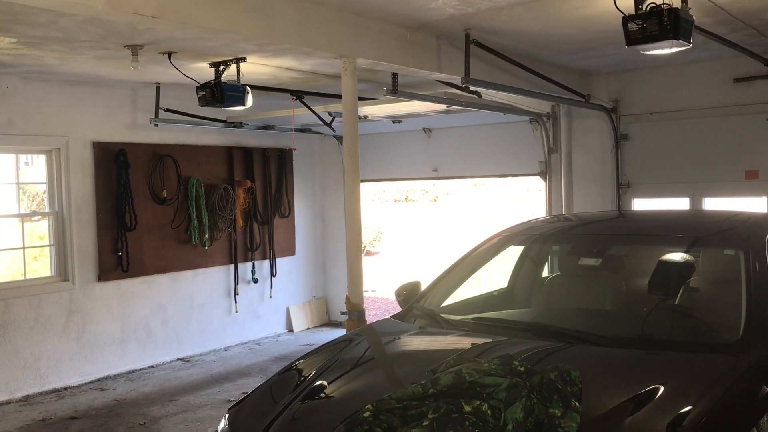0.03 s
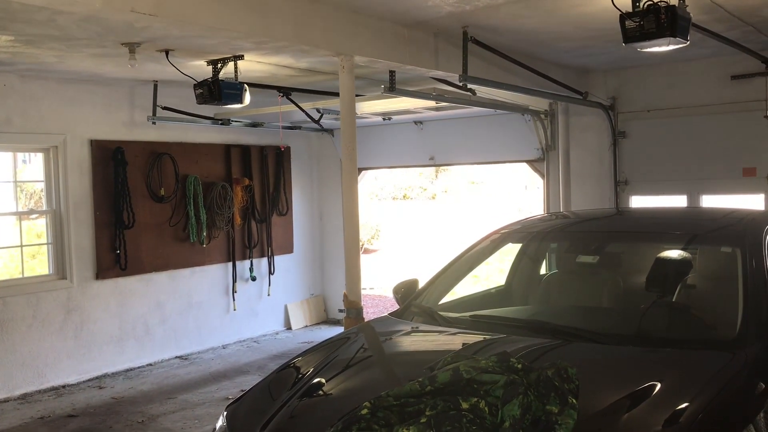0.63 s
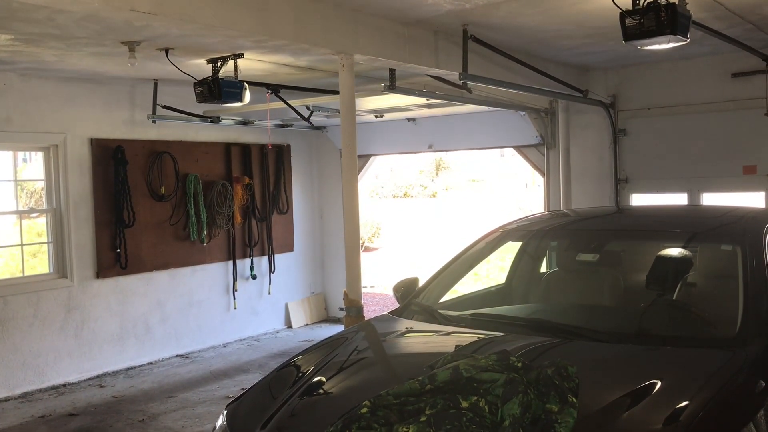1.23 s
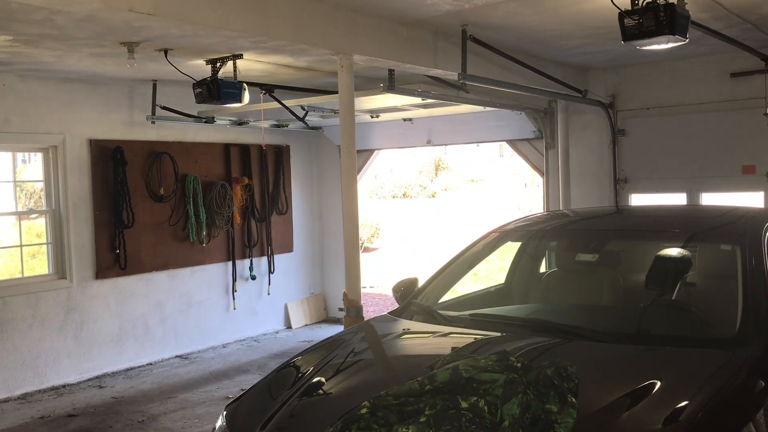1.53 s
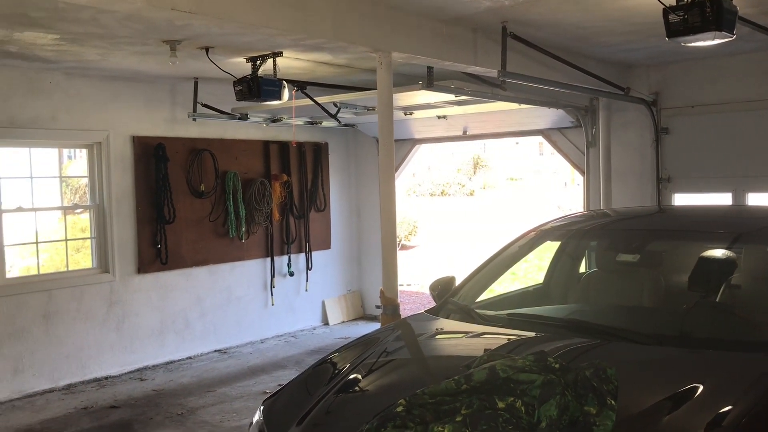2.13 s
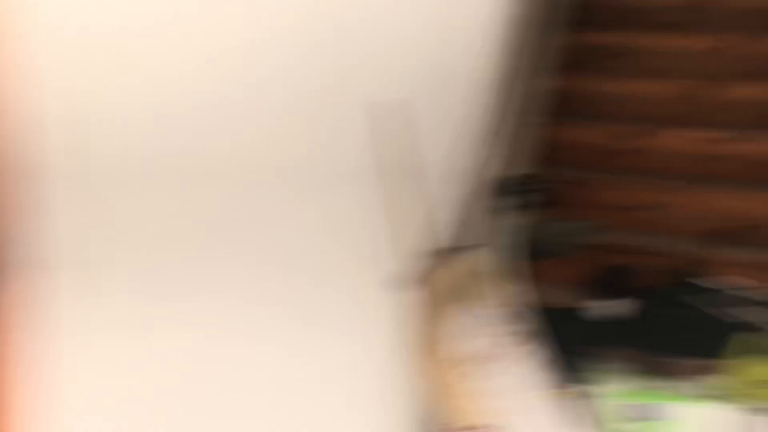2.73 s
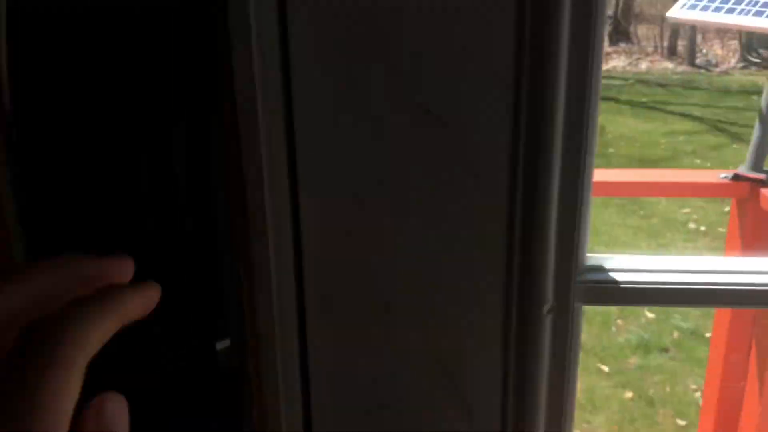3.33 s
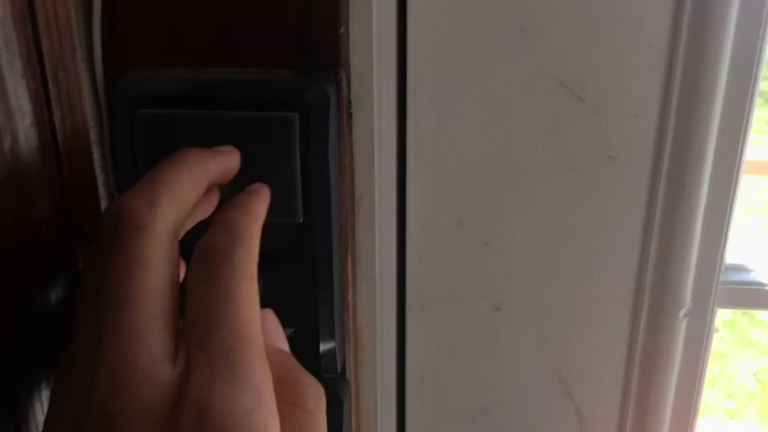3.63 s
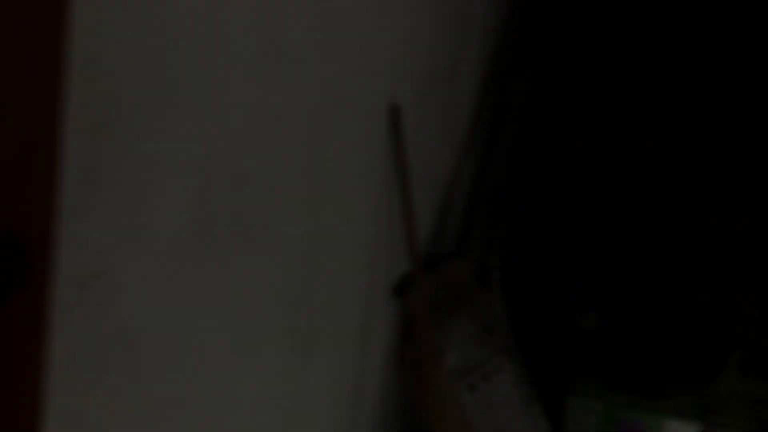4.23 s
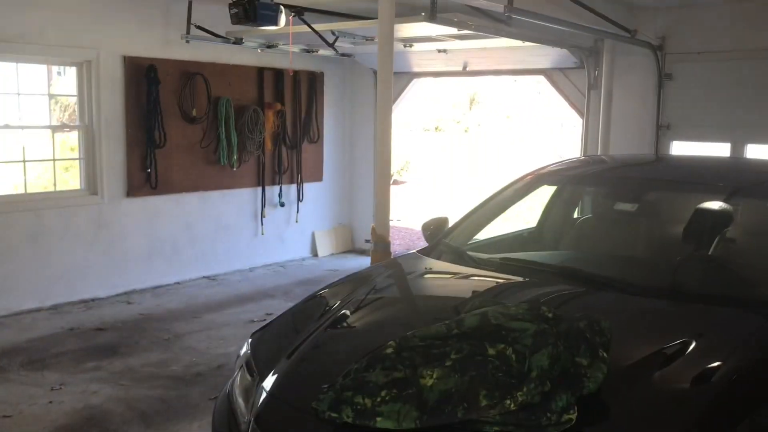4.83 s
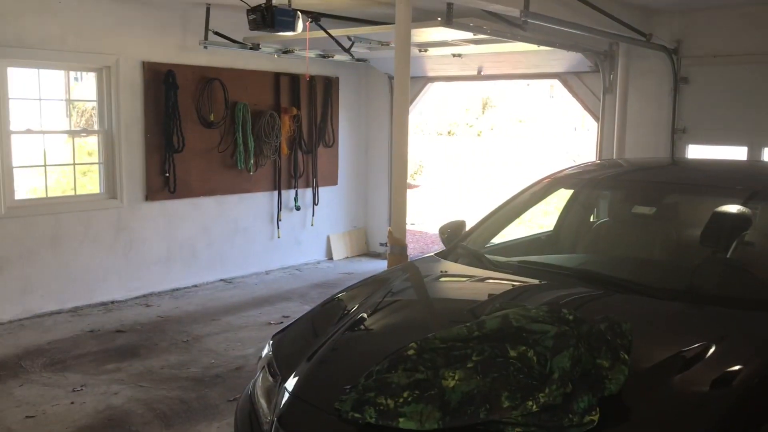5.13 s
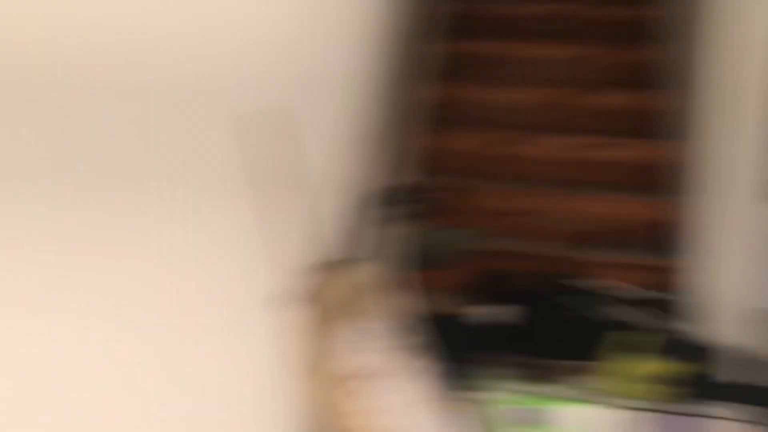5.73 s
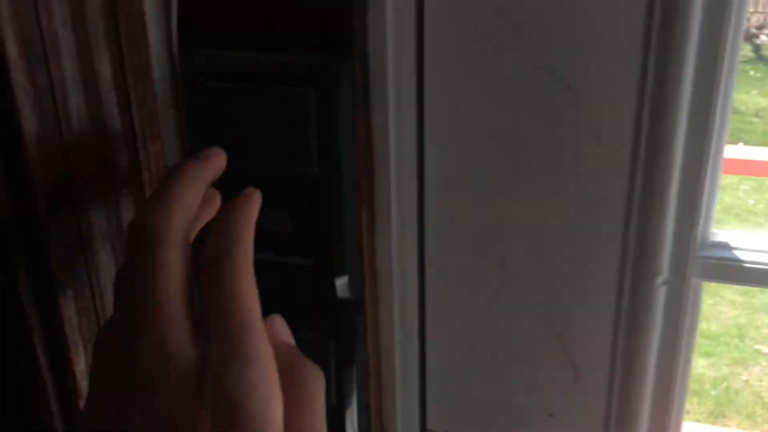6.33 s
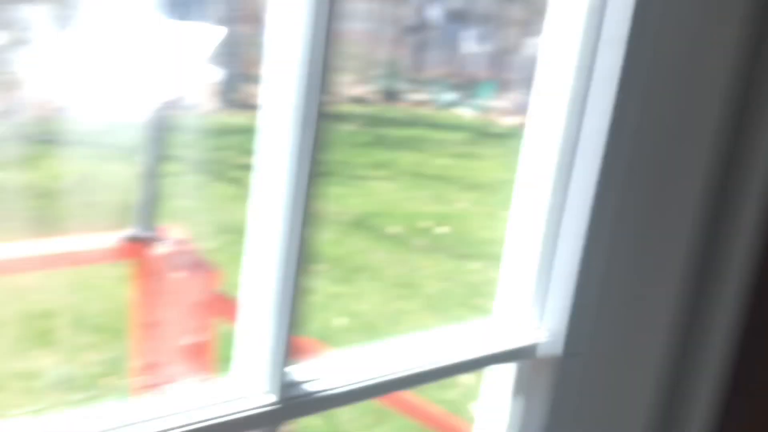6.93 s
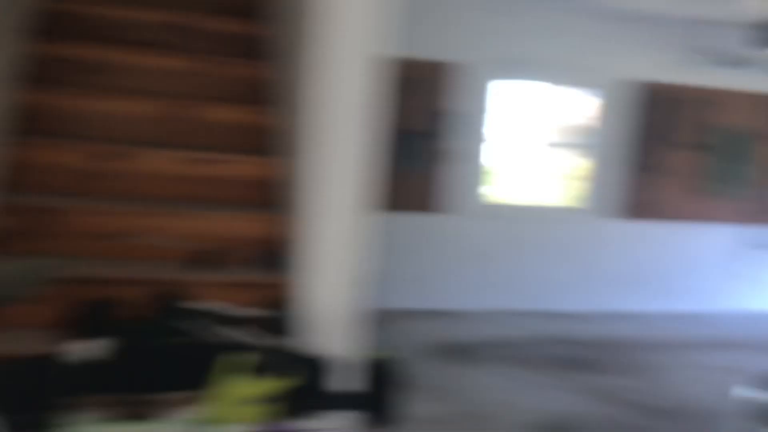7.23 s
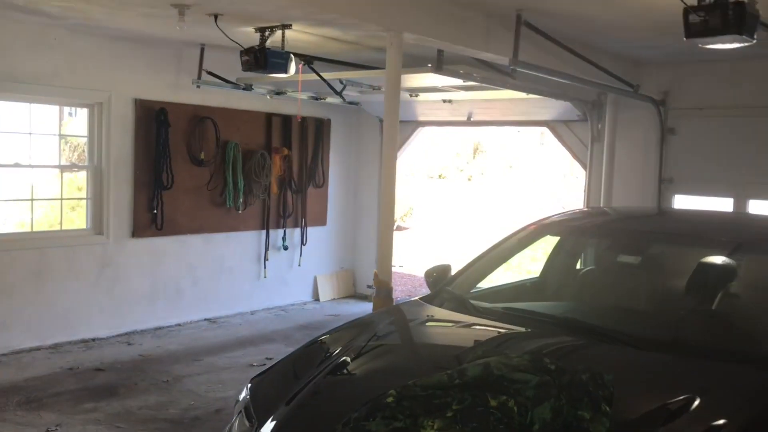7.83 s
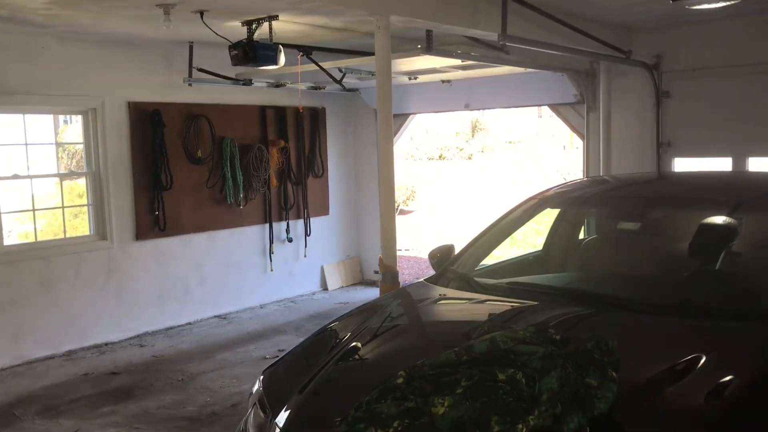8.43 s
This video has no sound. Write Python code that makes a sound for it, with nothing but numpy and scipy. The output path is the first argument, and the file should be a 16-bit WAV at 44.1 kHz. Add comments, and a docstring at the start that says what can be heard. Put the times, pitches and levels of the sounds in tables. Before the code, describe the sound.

A garage door rolls open with a motor hum, rattling chain, high squeaks and steel knocks that echo off hard walls. After it halts, soft close sounds take over: cloth rustle, taps and low puffs of air on a handheld microphone, with two plastic button clicks and a few relay snaps further off. Then the opener starts again, and the descending door clanks sharply in its track.

```python
"""A hard-walled garage: an opener hauls a sectional door open, stops, and later starts it down again.
The motor hums, the panels rumble, chain and rollers rattle along the steel track, dry hinges squeak
and knock, loudest on the way down, and relays snap in the opener's housing.
Between the runs someone with a handheld microphone turns twice to press the wall button:
a sleeve rustles, fingers tap the case and air puffs over the microphone."""
import sys
import numpy as np
from scipy import signal
from scipy.fft import rfft, irfft, next_fast_len
from scipy.io import wavfile
from scipy.ndimage import uniform_filter1d, map_coordinates

SR = 44100
rng = np.random.default_rng(int(sys.argv[2]) if len(sys.argv) > 2 else 0)


def wav_out(sig):
    """Save sig, one row per channel (or a flat mono array), as 16-bit PCM at SR to the path in sys.argv[1]."""
    wavfile.write(sys.argv[1], SR, np.round(np.clip(np.atleast_2d(sig).T, -1, 1) * 32767).astype(np.int16))


N = 377937

# room tone: (frequency [Hz], level [dB])
ROOM_SPECTRUM = [(15, -50), (25, -10.5), (59, -4.5), (122, -14), (410, -19), (469, -24), (537, -22),
                 (648, -23.5), (1450, -34.5), (15500, -40.5)]
# reverb decay: (frequency [Hz], t60 [s])
GARAGE_DECAY = [(150, 0.75), (1000, 0.77), (4000, 0.52), (8000, 0.41), (15000, 0.23)]

# swings of arm and body: (time [s], sleeve level [dB], rise [s])
SWINGS = [(2.68, -63.5, 0.38), (3.25, -62, 0.27), (4.2, -65, 0.4), (4.78, -63, 0.31), (5.85, -62.5, 0.17),
          (6.13, -59, 0.18), (6.9, -66.5, 0.33), (7.45, -69, 0.62)]
# puffs of air: (time [s], level [dB], rise [s])
GUSTS = [(3.07, -60, .17), (4.27, -38, 0.088), (4.41, -45.5, .035), (4.9, -60, 0.13), (5.94, -55, 0.15),
         (6.66, -57, 0.13), (6.97, -44, 0.037), (7.2, -46, .12)]
# slow air, fast air, soft sleeve rustle, bright sleeve rasp: (frequency [Hz], level [dB])
DRAUGHT_SPECTRUM = [(22, -28), (36, -5), (52, 3.5), (80, -4), (130, -11.5), (250, -21.5), (500, -61)]
BUFFET_SPECTRUM = [(28, -19), (52, -3), (80, 10.5), (110, -11), (200, -13), (330, -18.5), (450, -43),
                   (800, -68)]
CLOTH_SPECTRUM = [(300, -9), (700, -0.5), (1050, 3.5), (1800, -2), (4200, -6), (6500, -9), (9000, -14),
                  (15500, -18.5)]
RASP_SPECTRUM = [(1200, -27), (3500, 1), (6500, 1), (10000, -8), (15500, -7)]
# finger ticks: (time [s], level [dB], treble tilt [dB/octave])
TAPS = [(2.724, -36, 7), (2.869, -52, 6), (6.679, -46, 1), (7.555, -51, -4)]
# tone of a tapped case: (frequency [Hz], level [dB])
CASE_SPECTRUM = [(60, 17), (250, 0), (900, 3.5), (3000, -4), (6000, -18), (15000, -27.5)]
# soft hand bumps: (time [s], level [dB], nominal pitch [Hz])
BUMPS = [(2.434, -51, 152), (2.526, -48, 590), (2.666, -54.5, 344), (2.703, -53, 430), (2.848, -56.5, 347),
         (2.999, -47, 90), (4.21, -36.5, 188), (4.402, -34.5, 109), (5.92, -43, 65), (6.679, -52.5, 241),
         (6.957, -41.5, 93), (7.149, -47.5, 180), (7.546, -57, 196)]
# scuffs of skin, shoe and cloth: (time [s], level [dB], centre [Hz], length [s])
SCUFFS = [(2.365, -55, 1130, 0.087), (2.73, -52.5, 6600, 0.033), (2.93, -58, 900, 0.11),
          (3.312, -61, 1900, 0.04), (4.874, -55.5, 1400, 0.045), (5.777, -55.5, 1250, 0.019),
          (5.881, -59, 1120, .05)]

# wall button presses: (time [s], relative level [dB])
PRESSES = [(3.663, -47), (6.579, -45.5)]
# ring of the button's mount: (frequency [Hz], level [dB], t60 [s])
BUTTON_MODES = [(408, 4.5, 0.042), (850, 10.5, 0.023), (1470, -9.5, 0.033), (3430, -16, 0.039),
                (3940, -7.5, 0.02), (6200, -18, 0.016)]
# relays and latching gear: (time [s], level [dB], treble tilt [dB/octave])
RELAY_SNAPS = [(2.131, -42, 2), (2.155, -47.5, -3), (2.187, -45, 2.5), (4.729, -49, 5),
               (4.791, -47.5, -0.5), (7.69, -48.5, 4), (7.857, -46.5, 0.5)]
# ring of the opener's housing: (frequency [Hz], width [Hz], level [dB])
HOUSING_MODES = [(396, 360, -18), (690, 100, -17), (920, 133, 7), (1190, 34, -11), (1640, 230, 2.5),
                 (2230, 360, -10), (3180, 230, -19), (3850, 330, 4), (5700, 550, -9.5), (9000, 1200, -16)]

# dry rollers and hinges: (time [s], level [dB], pitch [Hz], width [Hz], length [s])
SQUEAKS = [(0.0, -41, 4660, 905, 0.05), (0.113, -37, 4560, 170, 0.092), (0.143, -41.5, 4230, 1600, 0.34),
           (0.512, -46, 4420, 800, 0.09), (0.69, -52.5, 6540, 1100, 0.4), (0.861, -45, 3560, 2000, 0.18),
           (1.498, -33, 5000, 1790, 0.035), (1.597, -29, 4000, 456, 0.018), (1.616, -35, 4120, 1400, 0.08),
           (7.957, -43.5, 4450, 1400, 0.063)]
# knocks in the track: (time [s], level [dB], treble tilt [dB/octave], chatter t60 [s])
CLANKS = [(0.147, -40, -4, 0.45), (0.525, -50.5, -5, 0.038), (0.715, -48.5, 2, 0.28),
          (1.104, -42.5, -1.5, .1), (1.14, -39.5, -2, 0.13), (1.275, -40, -1.5, 0.33),
          (1.468, -35, 2.5, 0.18), (1.499, -36, 0.5, 0.05), (1.598, -36.5, 4, 0.11),
          (1.793, -43, 1.5, 0.039), (7.92, -47, 10, 0.034), (8.015, -30.5, 5, 0.061),
          (8.032, -29.5, 3.5, 0.063), (8.166, -31, 0.5, 0.17), (8.208, -28.5, 7, 0.1), (8.23, -26, 3, 0.1),
          (8.366, -34.5, 1.5, 0.072), (8.393, -32, 2.5, 0.06), (8.408, -32.5, 4, 0.13),
          (8.521, -33.5, -2, 0.16)]
# tone of rollers, chain links and struck steel: (frequency [Hz], level [dB])
ROLLER_SPECTRUM = [(2500, -39), (4200, 6), (6500, -2), (8000, -1), (10000, -8), (15500, -9)]
CHAIN_SPECTRUM = [(250, -26), (430, -9), (605, -4), (662, -2.5), (852, -7), (1080, -5), (2210, -11.5),
                  (3440, -10.5), (4990, -21.5), (5880, -17.5), (7570, -36.5), (9750, -25), (15000, -37.5)]
STEEL_SPECTRUM = [(260, -47), (450, -13), (671, -1), (889, -12.5), (1680, 5), (2160, -2.5), (3970, 2.5),
                  (4340, -0.5), (8320, -16), (12100, -15.5), (15500, -22.5)]
# ring of the track and the door panels: (frequency [Hz], width [Hz], level [dB])
TRACK_MODES = [(1090, 220, 0.5), (1740, 260, -8), (1887, 34, 0), (2283, 20, 8), (2800, 160, -35),
               (4015, 230, 12), (4670, 100, -3), (5050, 83, -20), (6250, 530, -2), (7040, 30, 9),
               (8610, 1400, -6.5)]
PANEL_MODES = [(52, 46, -2), (90, 75, 1), (187, 29.5, 1), (233, 14.7, 8), (292.3, 41, 5), (358, 30, 5)]
# motor partials: (frequency [Hz], level [dB])
HUM_PARTIALS = [(120, 2), (181, -44), (238.5, -21), (360, 1.5), (585, -15), (674, -10)]
# the opener's runs, up then down: (switch-on [s], switch-off [s])
RUNS = [(-1, 1.77), (7.93, 9)]
# the door's lower edge: (time [s], height [m])
DOOR_HEIGHT = [(0, 1.48), (1.8, 2.1), (8, 2.1), (8.57, 1.9)]

TAKE_UP_S, DOOR_STOP_DB_PER_S = 0.062, 55.5  # the chain takes up its slack; the rattle dies away
RUMBLE_DB_PER_M, HUM_DB_PER_M = 4, -3.5  # panels lying overhead shake more and load the motor less
TOP_HZ = 15850


def amp(db):
    """Decibels to gain."""
    return 10 ** (np.asarray(db) / 20)


def unit(x):
    """Scale to rms 1."""
    return x / np.sqrt(np.mean(x ** 2) + 1e-20)


def crest(x):
    """Scale a hit so that its loudest 5 ms have rms 1."""
    return x / np.sqrt(uniform_filter1d(x ** 2, size=220).max())


def along(points, hz):
    """Read (frequency [Hz], value) points on a log axis."""
    freqs, values = np.transpose(points)
    return np.interp(np.log(hz + 1), np.log(freqs + 1), values)


def wobble(rate):
    """A smooth random curve, rate knots a second."""
    knots = rng.standard_normal(int(N * rate / SR) + 4)
    return map_coordinates(knots, [np.arange(N) * rate / SR])


def filtered(x, response):
    """Filter x by a function of frequency."""
    size = next_fast_len(len(x) + SR // 2)
    return irfft(rfft(x, size) * response(np.fft.rfftfreq(size, 1 / SR)), size)[:len(x)]


def coloured(x, spectrum):
    """EQ x with a (frequency [Hz], level [dB]) curve."""
    return filtered(x, lambda hz: amp(along(spectrum, hz)))


def resonate(x, modes):
    """Ring a body of (frequency [Hz], width [Hz], level [dB]) modes with x."""
    return filtered(x, lambda f: sum(
        (-1) ** k * amp(db) * 1j * f * width / (centre ** 2 - f ** 2 + 1j * f * width)
        for k, (centre, width, db) in enumerate(modes)))


def band(x, centre_hz, width_hz):
    """x through one steep-sided resonance."""
    mode = [(centre_hz, width_hz, 0)]
    return resonate(resonate(x, mode), mode)


def tilted(x, tilt_db):
    """A harder contact is brighter: treble tilt in dB per octave."""
    return filtered(x, lambda hz: amp(tilt_db * np.log2(np.clip(hz, 2500, 12000) / 4000)))


def impacts(n, rate, spread_db):
    """Random tiny contacts of uneven size, rate a second."""
    hits = rng.random(n) < rate / SR
    return hits * rng.choice([-1, 1], n) * amp(spread_db * rng.standard_normal(n))


def dying(t60):
    """Half a second of exponential decay."""
    return 1000 ** (-np.arange(SR // 2) / SR / t60)


def stroke(length):
    """One rub of noise: quick attack, slower release."""
    progress = np.arange(SR // 2) / SR / length
    return rng.standard_normal(len(progress)) * (1 - np.exp(-10 * progress)) * np.exp(-2 * progress ** 2)


def add(track, s, x):
    """Mix x into the track at time s."""
    part = track[max(0, round(s * SR)):][:len(x)]
    part += x[:len(part)]


def swells(rows, fall):
    """Envelope of bell-shaped swells; each falls in fall times its rise."""
    t = np.arange(N) / SR
    power = np.zeros(N)
    for s, db, rise in rows:
        width = np.where(t < s, rise, fall * rise)
        power += (amp(db) * np.exp(-((t - s) / width) ** 2)) ** 2
    return np.sqrt(power)


def running(rise_s, stop_db_per_s):
    """Envelope of a driven part: it picks up at switch-on, holds, and dies away after switch-off."""
    t = np.arange(N) / SR
    return sum(np.clip((t - on) / rise_s, 0, 1) * amp(-stop_db_per_s * np.maximum(t - off, 0))
               for on, off in RUNS)


def shaken(t60):
    """Envelope of a part that every clank sets shaking."""
    power = np.zeros(N)
    for s, db, *_ in CLANKS:
        add(power, s, (amp(db) * (dying(t60) - dying(0.043))) ** 2)
    return np.sqrt(power)


def lift():
    """Door height in metres: zero overhead, negative below."""
    height = np.interp(np.arange(N) / SR, *np.transpose(DOOR_HEIGHT))
    return height - height.max()


def garage(x, wet_db):
    """Direct sound plus a diffuse tail whose treble dies first."""
    hz, t, noise = signal.stft(rng.standard_normal(SR // 2), SR, nperseg=256)
    decay = 1000 ** (-t / along(GARAGE_DECAY, hz)[:, None])
    tail = signal.istft(noise * decay, SR, nperseg=256)[1]
    return x + amp(wet_db) * signal.fftconvolve(x, tail / np.linalg.norm(tail))[:len(x)]


def travelling(x, wet_db):
    """A source moving along the track meets ever new echoes: five reverbs crossfade."""
    paths = np.abs([wobble(4) for _ in range(5)])
    paths /= np.linalg.norm(paths, axis=0)
    return x + sum(garage(share * x, wet_db) - share * x for share in paths)


def noise_bed(spectrum):
    """Steady coloured noise at rms 1."""
    return unit(coloured(rng.standard_normal(N), spectrum))


def room_tone():
    """A faint, dark bed under everything."""
    return amp(-65.5) * noise_bed(ROOM_SPECTRUM)


def turning():
    """Swinging round pushes air over the microphone and rubs the sleeve."""
    motion = np.hypot(swells(SWINGS, fall=0.99), amp(-72.5))  # the sleeve never quite rests
    flow = np.hypot(swells(GUSTS, fall=0.8), amp(-2) * motion)
    turbulent = flow ** 2 / (flow ** 2 + amp(-47.5) ** 2)  # faster air buffets at a higher pitch
    draught = np.sqrt(1 - 0.7 * turbulent) * noise_bed(DRAUGHT_SPECTRUM)
    buffet = 0.8 * turbulent * noise_bed(BUFFET_SPECTRUM)
    air = amp(1.5) * flow * (draught + buffet)
    fibres = unit(coloured(impacts(N, rate=7000, spread_db=1), CLOTH_SPECTRUM))
    rasp = amp(-65.5) * (motion / motion.max()) ** 2 * noise_bed(RASP_SPECTRUM)  # faster is brighter
    rustle = amp(-1.5 + 1.4 * wobble(22)) * motion * fibres
    return air + rustle + rasp


def handling():
    """Close and dry: fingers tick on the case, the hand bumps it, and skin, shoe and cloth scuff."""
    out, t = np.zeros(N), np.arange(SR // 2) / SR
    for s, db, tilt_db in TAPS:
        tick = rng.standard_normal(len(t)) * (dying(0.01) - dying(0.003) + amp(-30) * dying(0.06))
        add(out, s, amp(db) * crest(tilted(coloured(tick, CASE_SPECTRUM), tilt_db)))
    for s, db, hz in BUMPS:
        phase = 2 * np.pi * hz * 0.013 * np.log1p(t / 0.0082)  # the pitch sags as the skin relaxes
        attack = 1 - np.exp(-(t * hz / 0.19) ** 2)
        add(out, s, amp(db) * crest(np.sin(phase) * dying(0.035 + 4 / hz) * attack))
    for s, db, hz, length in SCUFFS:
        add(out, s, amp(db) * crest(band(stroke(length), hz, 1.14 * hz)))
    return out


def button():
    """The plastic wall button clicks; its mount rings a moment later."""
    out, t = np.zeros(N), np.arange(SR // 2) / SR
    for s, db in PRESSES:
        ring = sum(amp(level) * dying(t60) * np.sin(2 * np.pi * hz * t) * (1 - np.exp(-t * hz / 8))
                   for hz, level, t60 in BUTTON_MODES)
        click = amp(-17) * rng.standard_normal(len(t)) * (dying(0.055) - dying(0.0082))
        add(out, s, amp(db - 5) * crest(garage(ring + click, wet_db=-11.5)))
    return out


def relays():
    """A contact snaps inside the opener's housing and rings it."""
    out = np.zeros(N)
    for s, db, tilt_db in RELAY_SNAPS:
        snap = rng.standard_normal(SR // 2) * (dying(0.046) - dying(0.016))
        add(snap, 0.017, amp(-2) * snap)  # slapback off a wall
        clack = unit(resonate(snap, HOUSING_MODES)) + amp(-6) * unit(coloured(snap, CASE_SPECTRUM))
        add(out, s, amp(db) * crest(garage(tilted(clack, tilt_db), wet_db=-4)))
    return out


def squeaks():
    """Steel rubbing on steel sings in one resonance."""
    out = np.zeros(N)
    for s, db, hz, width, length in SQUEAKS:
        add(out, s, amp(db) * crest(garage(band(stroke(length), hz, width), wet_db=-4)))
    return out


def rollers():
    """Tiny roller contacts make a gritty hiss that flares with every clank."""
    envelope = np.hypot(amp(-59.5) * running(TAKE_UP_S, DOOR_STOP_DB_PER_S), amp(-9) * shaken(t60=0.3))
    grit = coloured(impacts(N, rate=300, spread_db=5), ROLLER_SPECTRUM)
    return envelope * unit(travelling(grit, wet_db=10))


def chain():
    """Links rattle along the steel; loose ones slap the rail and ring it."""
    links = impacts(N, rate=400, spread_db=0.5) * amp(1.55 * wobble(25))
    slaps = impacts(N, rate=37, spread_db=4)
    rattle = unit(coloured(links, CHAIN_SPECTRUM)) + amp(-12) * unit(resonate(slaps, TRACK_MODES))
    return amp(-42) * running(TAKE_UP_S, DOOR_STOP_DB_PER_S) * unit(travelling(rattle, wet_db=3))


def motor(drift_rad=0.63, flutter_db=1.2):
    """Mains-driven hum fades in as the motor spins up; each partial sways with the load."""
    t = np.arange(N) / SR
    hum = sum(amp(db + flutter_db * wobble(7)) * np.sin(2 * np.pi * hz * t + drift_rad * wobble(11))
              for hz, db in HUM_PARTIALS)
    return amp(-41.5 + HUM_DB_PER_M * lift()) * running(rise_s=0.17, stop_db_per_s=86) * unit(hum)


def panels():
    """Motor and clanks shake the panels into a rumble; the heavy door's deep sway outlasts the run."""
    driven = amp(-38.5 + RUMBLE_DB_PER_M * lift()) * running(TAKE_UP_S, stop_db_per_s=70)
    shaking = np.hypot(driven, amp(-3) * shaken(t60=0.59))
    settling = amp(-52) * running(TAKE_UP_S, stop_db_per_s=13.5)
    rumble, sway = (resonate(impacts(N, rate=1500, spread_db=1), PANEL_MODES) for _ in range(2))
    rumble = coloured(rumble, [(25, -6), (50, 0), (380, -3), (480, -0.5), (1500, -27)])
    sway = filtered(sway, lambda hz: 1 / (1 + (hz / 139) ** 2))  # low end only
    return shaking * unit(rumble) + settling * unit(sway)


def clanks():
    """Hinges and rollers knock: a first contact and a dying chatter ring the track across the room."""
    out = np.zeros(N)
    for s, db, tilt_db, chatter_t60 in CLANKS:
        contacts = impacts(SR // 2, rate=1300, spread_db=2) * dying(chatter_t60)
        contacts[40] = 1.5  # the first contact
        modes = [(hz * (1 + 0.02 * rng.normal()), width, level + 3 * rng.normal())
                 for hz, width, level in TRACK_MODES]  # every joint has its own ring
        steel = unit(coloured(contacts, STEEL_SPECTRUM)) + amp(-4) * unit(resonate(contacts, modes))
        add(out, s, amp(db) * crest(garage(tilted(steel, tilt_db), wet_db=10)))
    return out


def scene():
    """Room tone, foley, switches and the moving door, alike in both channels."""
    mono = room_tone() + turning() + handling() + button() + relays()
    mono += squeaks() + rollers() + chain() + motor() + panels() + clanks()
    return np.array([mono, mono])


def record(dry):
    """A brick-wall low-pass trims the very top."""
    return np.array([filtered(channel, lambda hz: hz < TOP_HZ) for channel in dry])


dry = scene()
out = record(dry)
wav_out(out)
```